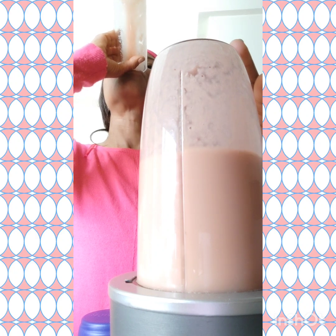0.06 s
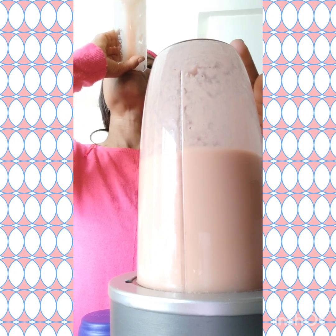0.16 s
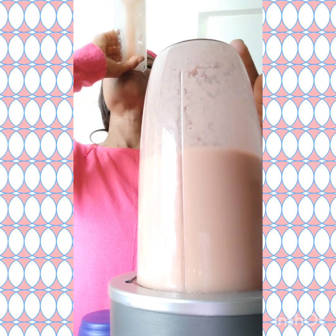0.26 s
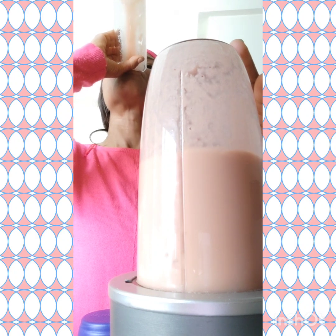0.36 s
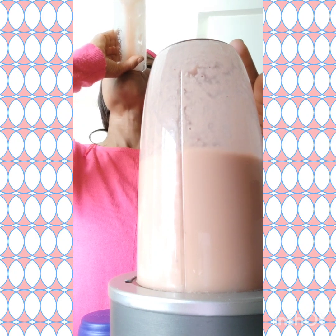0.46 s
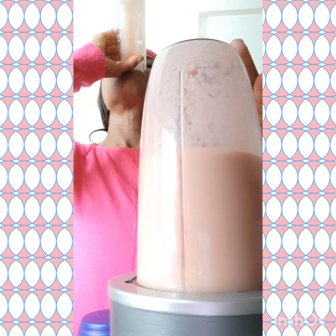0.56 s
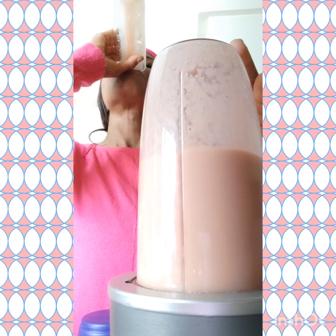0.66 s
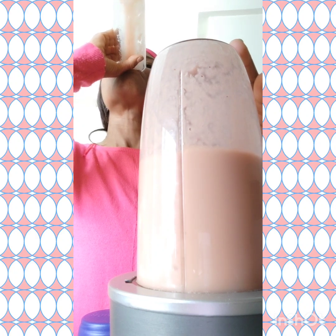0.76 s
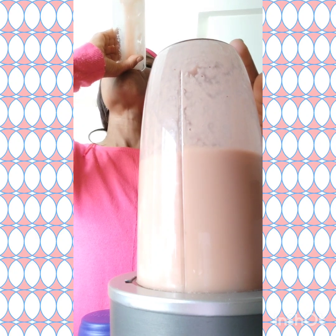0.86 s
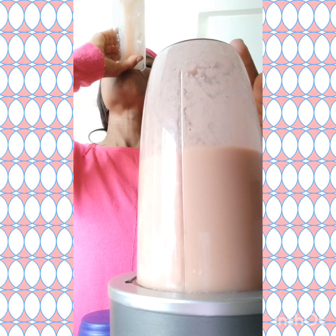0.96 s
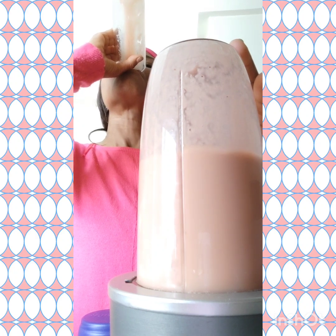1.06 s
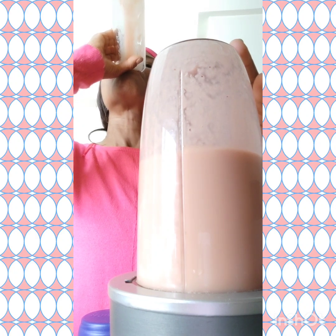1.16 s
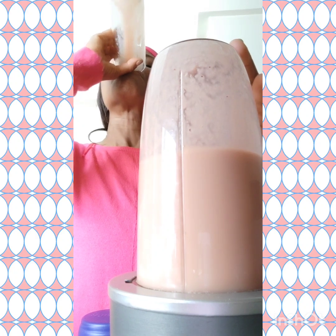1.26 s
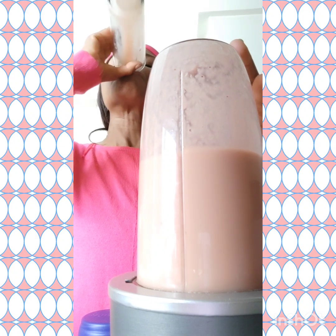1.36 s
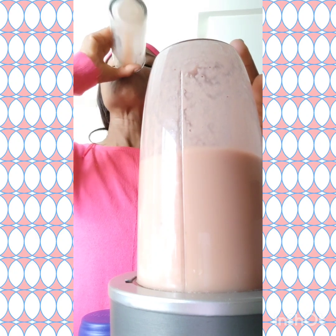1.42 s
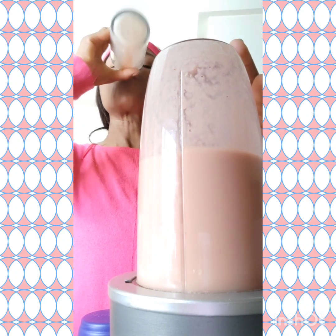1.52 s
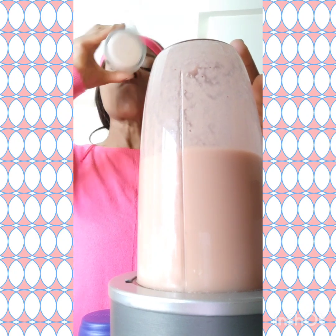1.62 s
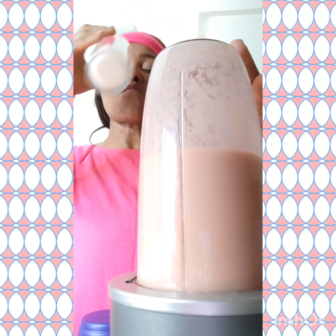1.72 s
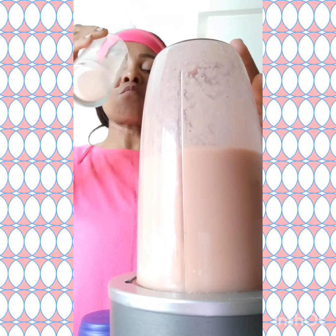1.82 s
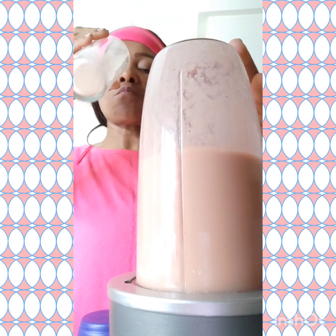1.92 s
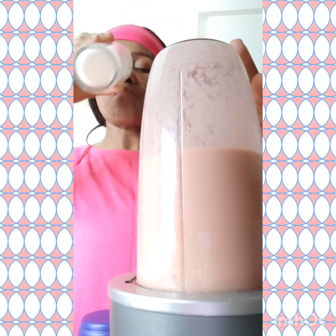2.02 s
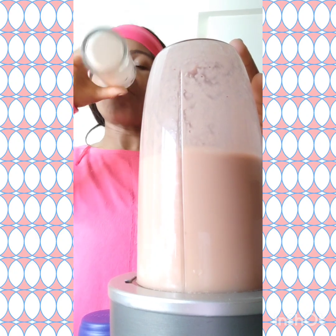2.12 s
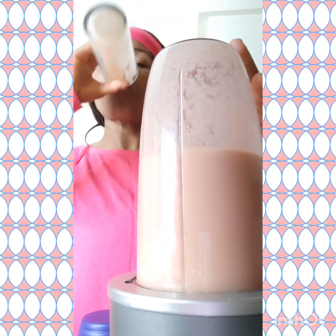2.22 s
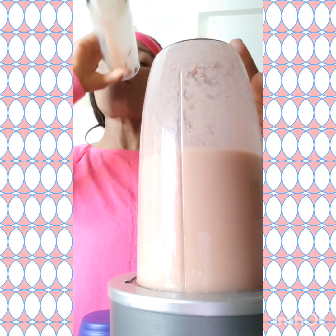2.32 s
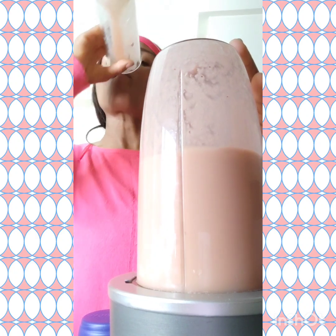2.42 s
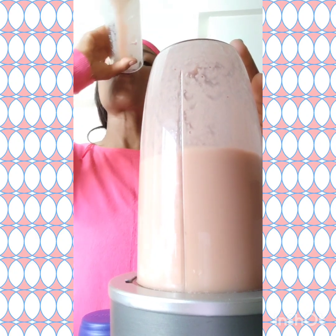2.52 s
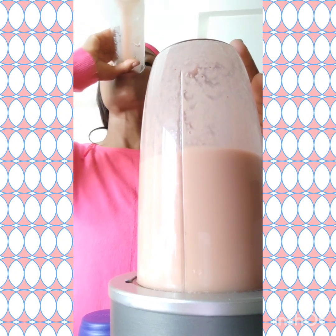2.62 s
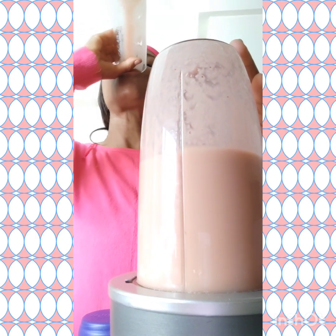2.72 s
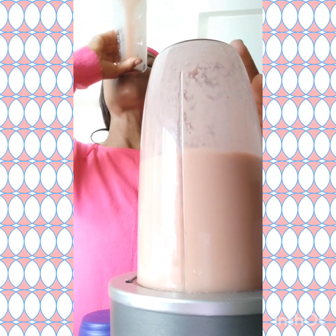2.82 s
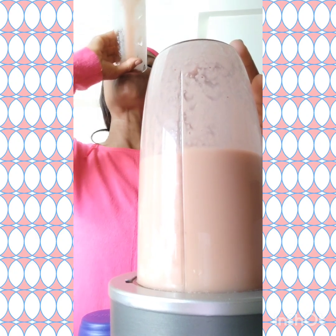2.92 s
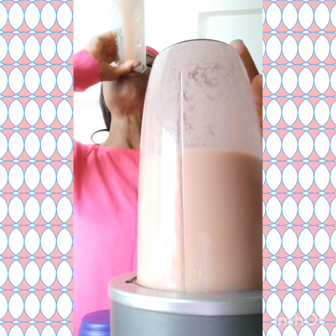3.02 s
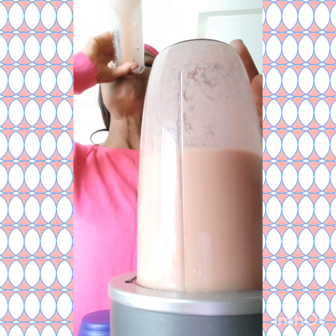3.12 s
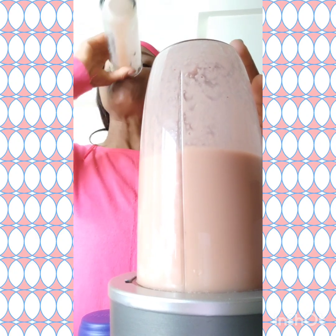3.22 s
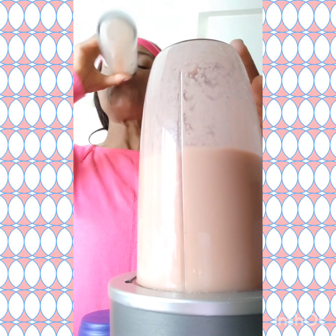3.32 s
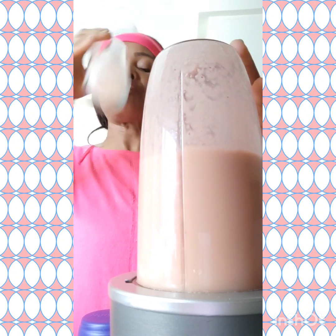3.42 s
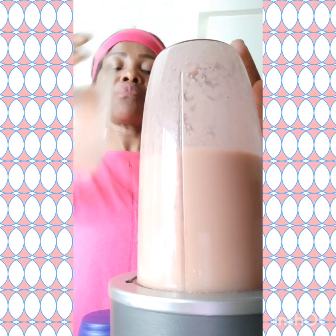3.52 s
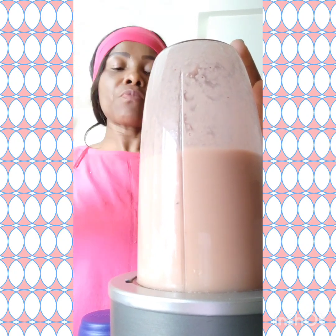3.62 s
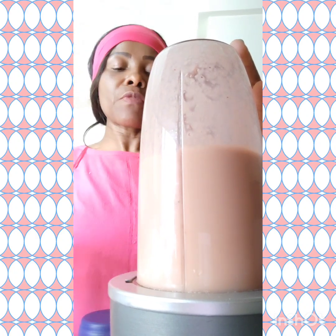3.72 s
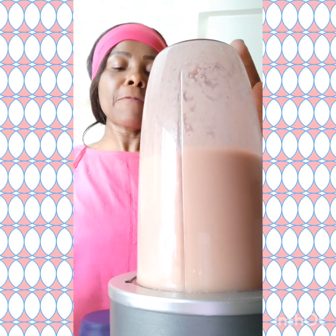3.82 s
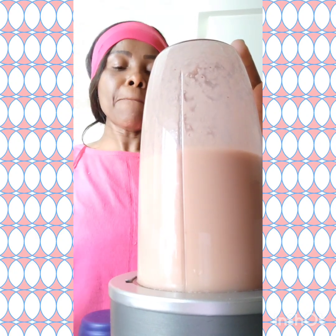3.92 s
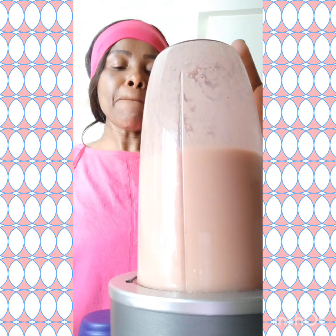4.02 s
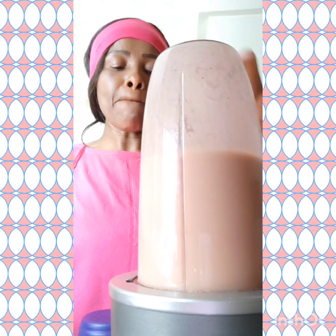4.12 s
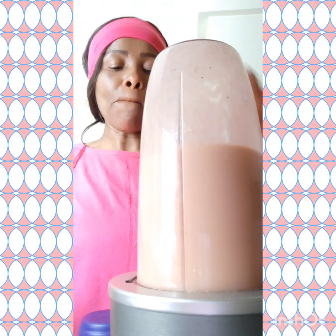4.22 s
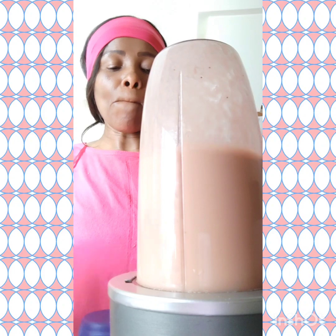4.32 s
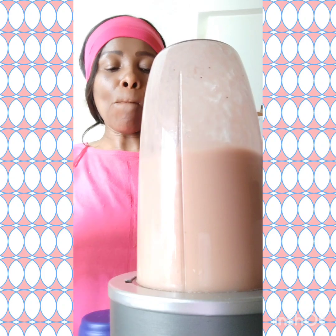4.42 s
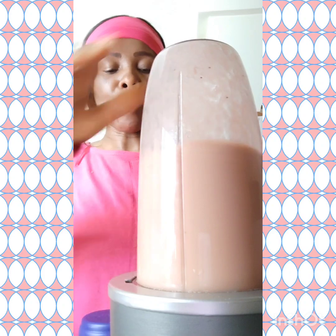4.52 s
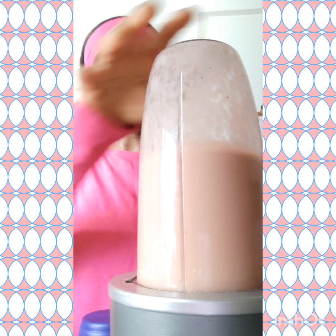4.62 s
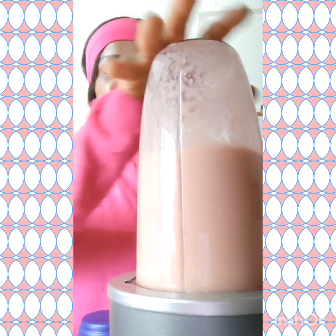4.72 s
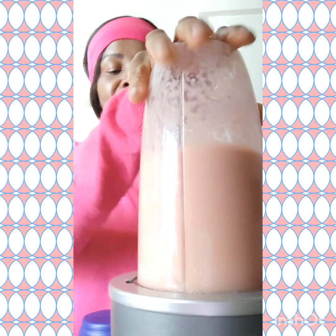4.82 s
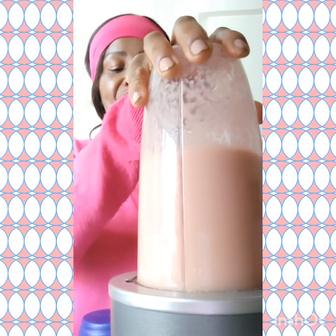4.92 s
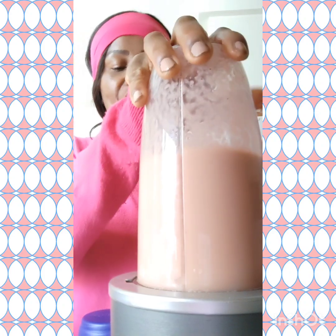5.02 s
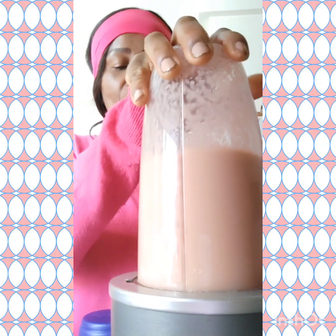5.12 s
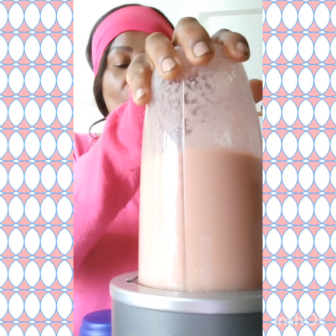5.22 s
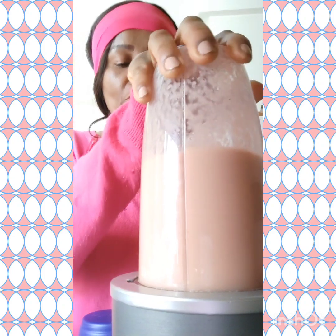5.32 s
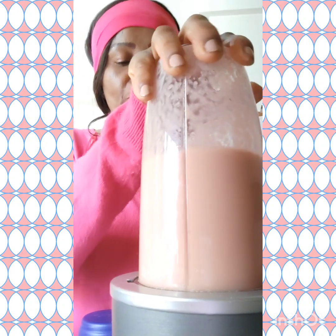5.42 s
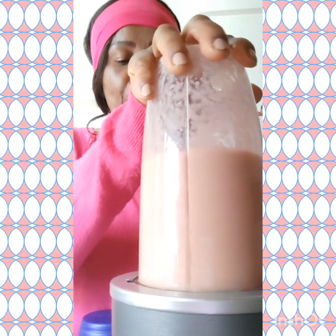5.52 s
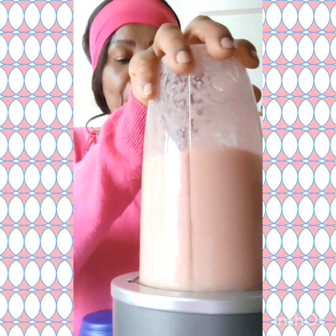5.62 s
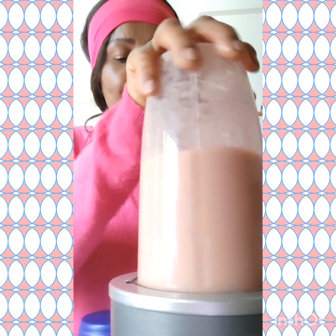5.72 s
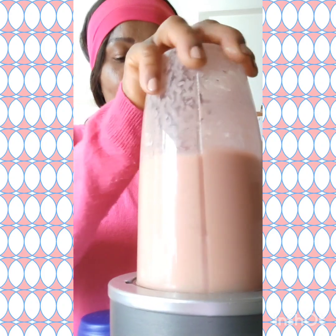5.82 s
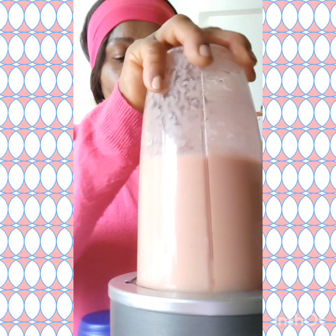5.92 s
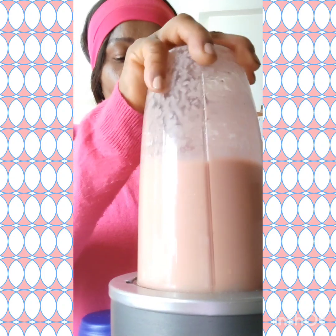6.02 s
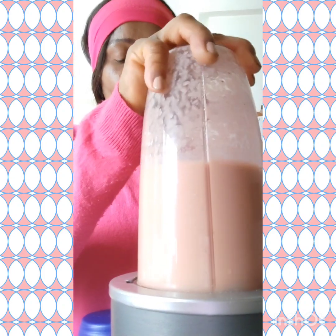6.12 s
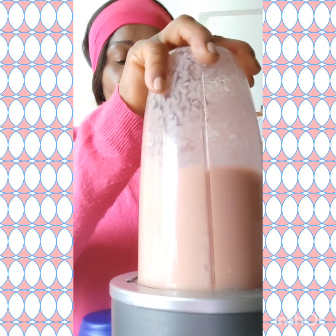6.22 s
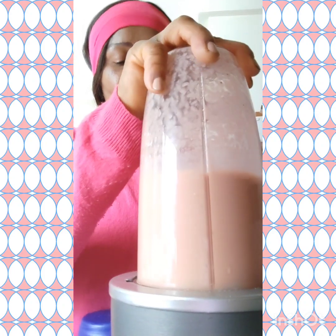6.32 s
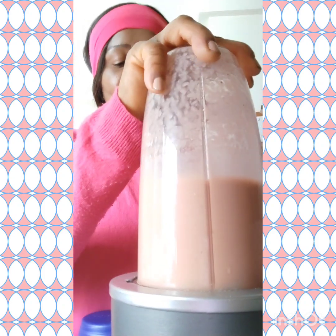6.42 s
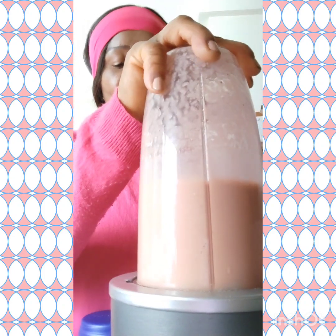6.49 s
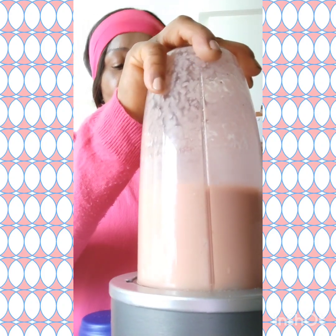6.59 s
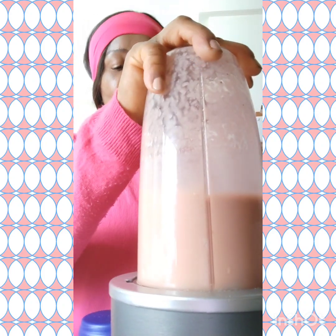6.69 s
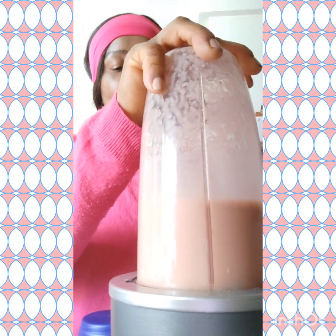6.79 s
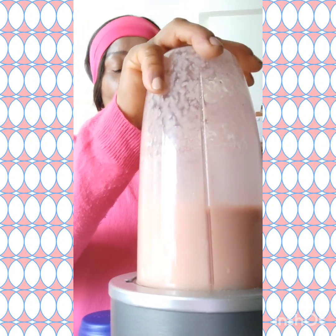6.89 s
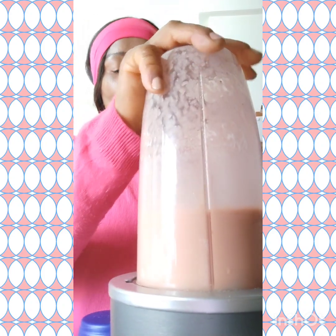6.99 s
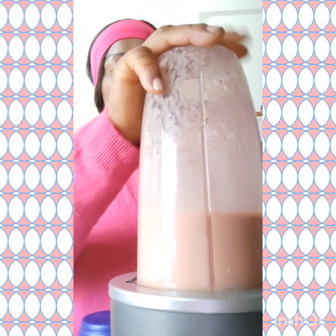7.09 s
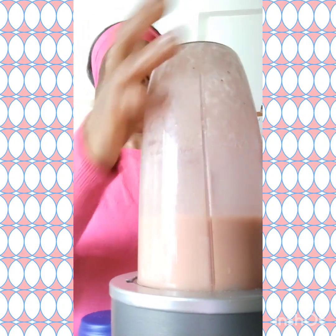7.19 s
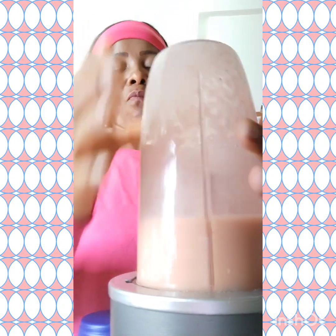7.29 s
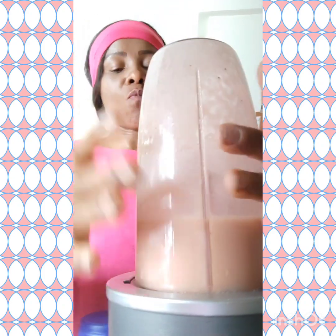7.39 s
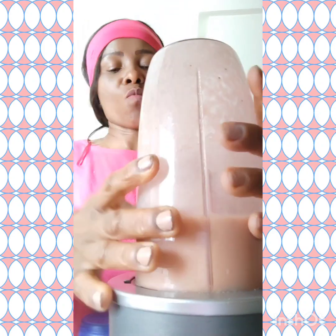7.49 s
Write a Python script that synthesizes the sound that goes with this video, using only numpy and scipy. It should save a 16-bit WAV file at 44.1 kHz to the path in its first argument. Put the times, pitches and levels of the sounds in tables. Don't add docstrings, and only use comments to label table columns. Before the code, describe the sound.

Close, harsh blender drone with one dull cup knock; power goes off, pitch slides down over a second, leaving faint taps in a quiet room.

```python
import sys
import numpy as np
from scipy import signal
from scipy.io import wavfile
from scipy.ndimage import uniform_filter1d

SR = 44100
rng = np.random.default_rng(int(sys.argv[2]) if len(sys.argv) > 2 else 0)


def file_out(sig):
    cols = np.atleast_2d(sig).T
    lim = np.clip(cols, -1, 1)
    pcm = np.round(lim * 32767).astype(np.int16)
    wavfile.write(sys.argv[1], SR, pcm)


def level_to_linear(level):
    exponent = np.asarray(level, float) / 20
    return 10 ** exponent


N = 332955
T = np.arange(N) / SR
FFT, HOP = 2048, 512

ROTOR_TONES = [(0, 1, -.1), (1, -1, -.3), (1, 0, -.6), (1, 1, -1.9), (2, -1, 1.6), (2, 0, -2), (2, 1, -1.3),
               (3, 0, -1.1), (5.286, 0, -1), (9, 0, .35), (10.572, 0, 1.4), (18, 0, -2.4), (27, 0, -2.5)]
# (left level [dB], right level [dB], waver [dB])
ROTOR_TONE_LEVELS = [(-54.5, -52, 0), (-35.5, -34, 0.3), (-30.5, -32, .4), (-47, -49, 2.5),
                     (-54.5, -46, 1.4), (-51, -43.5, 1.5), (-58.5, -56, 1), (-52.5, -45, 2),
                     (-44.5, -29, 1), (-32, -28.5, 1.85), (-46, -35, 1.5), (-36, -30.5, 2),
                     (-38.5, -38.5, 3.5)]
# (frequency [Hz], width [Hz], gain [dB])
BASE_RESONANCES = [(206, 80, 15), (152, 43, 11), (115, 18, 7)]
# (frequency [Hz], left density [dB/Hz], right density [dB/Hz])
CHURN_FLOOR = [(45.0, -93.5, -90.5), (85.0, -79, -83), (109, -66, -63), (300.0, -69.5, -68),
               (600.0, -67.5, -81.5), (1000.0, -67, -78), (1520, -60, -55), (2620, -60.5, -52.5),
               (3900, -61.5, -55), (6150, -68, -64.5), (10000.0, -69.5, -64.5), (12500.0, -70.5, -72.5),
               (14780, -80, -80.5), (15700.0, -85, -88.5)]
# (frequency [Hz], width [Hz], left [dB/Hz], right [dB/Hz], left phase
BLENDER_MODES = [(208.0, 107.0, -63.8, -62.4, 0.7), (460.0, 114.0, -72.0, -61.0, -0.0),
                 (831.0, 213.0, -65.0, -57.0, 1.2), (1119.0, 138.0, -87.2, -51.6, -2.7),
                 (1344.0, 268.0, -67.6, -53.5, -1.0), (1522.0, 130.0, -58.8, -55.7, -1.7),
                 (1757.0, 140.0, -67.4, -53.4, -0.6), (2017.0, 453.0, -52.7, -51.6, -1.2),
                 (2415.0, 60.0, -61.7, -65.2, -0.5), (2645.0, 66.0, -67.0, -52.6, 2.2),
                 (3002.0, 189.0, -56.9, -45.8, -1.4), (3254.0, 229.0, -46.7, -39.6, 0.4),
                 (3441.0, 76.0, -79.2, -44.2, 2.9), (3611.0, 264.0, -59.4, -49.9, 0.2),
                 (4008.0, 139.0, -57.6, -51.9, 1.0), (4147.0, 109.0, -56.5, -58.4, 1.6),
             (4427.0, 183.0, -61.4, -55.5, 0.4), (4828.0, 153.0, -60.4, -58.3, -0.4),
             (5548.0, 494.0, -64.5, -66.1, 1.2), (6114.0, 60.0, -64.5, -73.5, 0.7),
             (7267.0, 694.0, -67.2, -68.5, 0.3), (7849.0, 700.0, -92.0, -64.7, -2.4),
             (8496.0, 700.0, -73.6, -65.9, -3.1), (9168.0, 162.0, -68.7, -62.9, 1.3),
             (9617.0, 437.0, -71.6, -66.1, -0.1), (10413.0, 363.0, -93.1, -63.0, -1.3),
             (11549.0, 180.0, -69.3, -94.5, 1.1)]
# (frequency [Hz], likeness [0-1], left phase lead [rad])
CHURN_LIKENESS = [(40, .5, .1), (90, .96, .35), (200, .96, .6), (300, .8, .8), (600, .3, 0), (3000, .35, 0),
                  (6000, .25, 0)]
# (frequency [Hz], running level [dB], change under grip [dB])
CHURN_LAYERS = [(180, 1.1, 0.5), (500, 0.5, 1), (1500, -1.34, -1), (3300, 0.28, 0.33), (8000, -0.1, -.2)]
# (slope [dB/decade], knee [share of full speed], extra slope below knee [dB/decade])
LAYER_FADING = [(10, .005, 60), (12, 0.025, 63), (12, 0.035, 62), (.5, 0.14, 63.5), (31, 0.066, 78.5)]
# (frequency [Hz], width [Hz], left [dB], right [dB])
REFLECTION_BUMPS = [(625, 52, -9.5, -1), (986, 38, 1.5, 0), (1074, 40, 4.5, 3.5), (1600, 70, -2, -5.5),
                    (1843, 66, -0.5, -8.5), (2092, 73, 2, 2.5), (2837, 76, -2, -5), (2790, 60, 1, 3),
                    (3102, 70, 3.5, 7.5), (3040, 40, -2.5, -6.5), (3312, 59, -4.5, 3.5),
                    (3500, 46, 3.5, -4), (3790, 200, 1.5, -3.5), (4684, 52, -4, -4.5),
                    (5010, 250, -0.5, 1.5), (6280, 140, -3, -6)]
# (frequency [Hz], width [Hz], left change [dB], right change [dB])
COASTING_BUMPS = [(120, 38, 10, 8.5), (200, 60, -6.5, -3), (293, 120, 0.5, -8), (60.1, 54, -8.5, -6.5),
                  (470, 74, 2, 7.5), (610, 110, -17, -0.5), (1390, 120, -5, 6), (1730, 150, 3.5, 9),
                  (2140, 200, -1.5, -2), (2200, 86, 5, 7), (2570, 100, -1, 9.5), (2720, 150, -3.5, -5.5),
                  (3020, 150, 3, -7), (3180, 100, -4, 1), (3358, 96, -0.5, 9), (3720, 150, -2, 1),
                  (3960, 120, -2, 2), (4300, 150, -9, -2), (4650, 250, -3, 8.5), (5100, 250, -7, -3.5)]
# (frequency [Hz], width [Hz], left change [dB], right change [dB])
STOPPING_BUMPS = [(190, 63, -1, -1), (330, 120, -7, -4), (540, 130, 10, 15), (1750, 200, -3, -1.5),
                  (3200, 230, -6, -10), (3600, 200, -3, -3), (3430, 120, 6, 1), (12500, 2700, 4, 5)]
# (frequency [Hz], level [dB], t60 [s])
CUP_RING = [(152, -1.5, .13), (190, 0, .045), (550, -10, .1), (715, -2, .06), (790, -3, .05),
            (300, -6, .07), (410, -7, .06), (930, -4, .04)]
# (frequency [Hz], level [dB], t60 [s])
TAP_RING = [(250, 1, .04), (765, -14, .06), (1150, -11, .025), (2050, -8, .03), (2630, -4, .03),
            (3560, -2, .03), (3980, 0.5, .035), (7700, -10, .015)]
# (time [s], peak [dB], brightness [Hz], t60 [s])
TAP_HITS = [
    (7.2495, -44.5, 5000, .1),
    (7.368, -73, 13000, .02),
    (7.424, -75, 11000, .03),
    (7.434, -73, 11000, .025),
    (6.662, -50, 15000, .03),
]
# (frequency [Hz], density [dB/Hz])
ROOM_SPECTRUM = [(40, -19), (100, -10.5), (135, -19.5), (177, -3), (191, 1.5), (227, -6.5), (355, -20.5),
                 (382, -30), (527, -38), (582, -33.5), (933, -36.5), (5000, -40), (15000, -40)]
# (time [s], level [dB])
ROOM_SWELL = [(6.98, -81), (7.204, -77.5), (7.42, -75), (7.55, -72)]
# (frequency [Hz], level [dB], t60 [s])
THUMP_RING = [(118, -1.5, .15), (190, 1, .12), (260, -7, .1), (500, -17, .08), (765, -18, .1)]

MAINS_HZ, POWER_OFF_S, LEFT_LAG_SAMPLES = 100, 5.67, 36
RUN_HZ, DRAG_S, FRICTION_HZ, FREE_S = 254.8, .74, 42, 5.675
SEIZE_HZ, SEIZE_SOFT_HZ = 12.3, 2.1
GRIP_S, GRIP_RISE_S = 4.53, .99
SHAFT_DB, SHAFT_GRIP_DB, UNBALANCE_DB_PER_DECADE = .53, -1.4, 39
HUM_START_DB, HUM_DB_PER_S, HUM_GRIP_DB = -10.5, 2.5, 9.5
JOLT_DB, JOLT_S = -16, .015
BEARING_SWAY_DB, FAN_DB, FAN_SWAY_DB, SWAY_HZ = 1.77, 1.6, -.5, 1.7
FAN_SAG_DB, FAN_SAG_S = -1.5, 3.3


def curves(rows, at):
    x, *columns = np.transpose(rows)
    return [np.interp(at, x, column) for column in columns]


def spectra(rows, hz):
    rows = np.array(rows, float)
    return curves(np.c_[np.log(rows[:, 0]), rows[:, 1:]], np.log(hz + 1))


def slow(rate_hz):
    x = signal.lfilter(*signal.butter(2, rate_hz, fs=SR / 64), rng.standard_normal(N // 64 + 2))
    return np.interp(np.arange(N), np.arange(len(x)) * 64, x / x.std())


def bumps(rows, hz):
    total_db = 0
    for f, width, left_db, right_db in rows:
        total_db = total_db + np.outer([left_db, right_db], np.exp(-(2 * (hz - f) / width) ** 2))
    return total_db


def noise_pair(power, link, gain=1):
    z = signal.stft(rng.standard_normal((2, N)), SR, nperseg=FFT, noverlap=FFT - HOP)[2]
    link = (link / np.maximum(abs(link), 1))[:, None]
    own = np.sqrt(np.clip(1 - abs(link) ** 2, 0, 1))
    pair = np.array([link * z[1] + own * z[0], z[1]])
    shaped = pair * np.sqrt(power * SR / 2)[..., None] * gain
    return signal.istft(shaped, nperseg=FFT, noverlap=FFT - HOP)[1][:, :N]


def coasting(t):
    decay = np.exp(-np.maximum(t - FREE_S, 0) / DRAG_S)
    return np.maximum((RUN_HZ + FRICTION_HZ) * decay - FRICTION_HZ, .5)


def grip(t):
    return np.clip((t - GRIP_S) / GRIP_RISE_S, 0, 1)


def shake():
    hz = coasting(T)
    base_db = sum(db * np.exp(-(2 * (hz - f) / width) ** 2) for f, width, db in BASE_RESONANCES)
    shaft_db = SHAFT_DB + UNBALANCE_DB_PER_DECADE * np.log10(hz / RUN_HZ) + base_db - base_db[0]
    shaft_db += SHAFT_GRIP_DB * np.minimum(5 * grip(T), 1)
    shaft_db += JOLT_DB * np.exp(-((T - FREE_S - .005) / JOLT_S) ** 2)
    hum_db = HUM_START_DB + HUM_DB_PER_S * T + HUM_GRIP_DB * grip(T)
    return shaft_db, hum_db


def tones(turns):
    shaft_db, hum_db = shake()
    bearing_db = BEARING_SWAY_DB * slow(SWAY_HZ)
    fan_db = FAN_DB + FAN_SAG_DB * np.clip((T - FAN_SAG_S) / .3, 0, 1) + FAN_SWAY_DB * slow(SWAY_HZ)
    since_off_s = np.maximum(T - POWER_OFF_S, 0)
    out = np.zeros((2, N))
    for (order, beats, lead), (left_db, right_db, waver_db) in zip(ROTOR_TONES, ROTOR_TONE_LEVELS):
        phase = 2 * np.pi * (order * turns + beats * MAINS_HZ * T + rng.random())
        if beats == 0 and 0 < order < 3:
            db = shaft_db - 30 * since_off_s * (order - 1)
        else:
            if order == 0:
                db = hum_db
            elif order % 1:
                db = bearing_db
            else:
                db = fan_db * (order > 8)
            db = db - since_off_s * (150 + 60 * order)
        gain = np.sqrt(2) * level_to_linear(db + waver_db * slow(18))
        out += gain * [level_to_linear(left_db) * np.cos(phase + lead), level_to_linear(right_db) * np.cos(phase)]
    return out


def effort(t):
    soft_hz = SEIZE_SOFT_HZ * np.logaddexp(0, (coasting(t) - SEIZE_HZ) / SEIZE_SOFT_HZ)
    left = 1e-4 + soft_hz / (RUN_HZ - SEIZE_HZ)
    levels = []
    for (_, db, grip_db), (slope, knee, steep) in zip(CHURN_LAYERS, LAYER_FADING):
        knee_db = steep / 2 * np.log10((1 + (knee / left) ** 2) / (1 + knee ** 2))
        levels.append(db + grip_db * grip(t) + slope * np.log10(left) - knee_db)
    return np.array(levels)


def churn(speed, turns):
    hz = np.fft.rfftfreq(FFT, 1 / SR)
    frames_s = np.arange(N // HOP + 2) * HOP / SR
    power = level_to_linear(np.array(spectra(CHURN_FLOOR, hz))) ** 2
    same, same_lead = spectra(CHURN_LIKENESS, hz)
    shared = np.clip(same, 0, 1) * np.sqrt(power[0] * power[1]) * np.exp(1j * same_lead)
    for f, width, left_db, right_db, lead in BLENDER_MODES:
        shape = 1 / (1 + (2 * (hz - f) / width) ** 2) ** 2
        power = power + np.outer(level_to_linear(np.array([left_db, right_db])) ** 2, shape)
        shared += .81 * level_to_linear(left_db + right_db) * shape * np.exp(1j * lead)
    lag = np.exp(-2j * np.pi * hz * LEFT_LAG_SAMPLES / SR)
    link = shared / np.sqrt(power[0] * power[1]) * lag

    layer_log_hz = np.log(np.array(CHURN_LAYERS)[:, 0])
    change_db = np.array([np.interp(np.log(hz + 1), layer_log_hz, row) for row in effort(frames_s).T]).T
    slowing = np.clip((frames_s - POWER_OFF_S) / .69, 0, 1)
    stopping = np.clip((frames_s - 6.3) / .41, 0, 1)
    change_db = change_db + bumps(REFLECTION_BUMPS, hz)[..., None]
    change_db = change_db + bumps(COASTING_BUMPS, hz)[..., None] * slowing
    change_db = change_db + bumps(STOPPING_BUMPS, hz)[..., None] * stopping
    patches = uniform_filter1d(rng.standard_normal(change_db.shape[1:]), 20, 0)
    patches = uniform_filter1d(patches, 5, 1)
    change_db = change_db + .75 * patches / patches.std()
    count = signal.stft(T, nperseg=FFT, noverlap=FFT - HOP)[2].shape[1]
    noise = noise_pair(power, link, level_to_linear(change_db[..., :count]))
    throb_db = (.25 + 3 * np.exp(-speed / 50)) * np.cos(2 * np.pi * turns)
    return noise * level_to_linear(throb_db + .33 * slow(10) + .6 * slow(200))


def knock(start_s, peak_db, modes, scatter_db, scatter_hz, scatter_s, rise_s):
    t = T[:SR // 3]
    ring = -sum(level_to_linear(db - 60 * t / t60) * np.sin(2 * np.pi * hz * t) for hz, db, t60 in modes)
    band = signal.butter(3, [90, scatter_hz], "band", fs=SR, output="sos")
    scatter = signal.sosfilt(band, rng.standard_normal((2, len(t))))
    sound = ring + level_to_linear(scatter_db - 60 * t / scatter_s) * scatter / scatter.std()
    sound = sound * np.minimum(t / rise_s, 1)
    out = np.zeros((2, N + SR))
    out[:, round(start_s * SR):][:, :len(t)] = level_to_linear(peak_db) * sound / abs(sound).max()
    return out[:, :N]


def cup():
    return knock(3.929, -5.5, CUP_RING, -7.5, 550, .22, .0038)


def taps():
    return sum(knock(s, db, TAP_RING, 2, hz, t60, .001) for s, db, hz, t60 in TAP_HITS)


def room():
    hz = np.fft.rfftfreq(FFT, 1 / SR)
    power = level_to_linear(spectra(ROOM_SPECTRUM, hz)[0]) ** 2
    hum = noise_pair(np.array([power, power]), .9 / (1 + (hz / 600) ** 2))
    return hum / hum.std() * level_to_linear(curves(ROOM_SWELL, T)[0] + 1.5 * slow(8))


def thump():
    return knock(7.265, -51, THUMP_RING, -18, 4400, .25, .004)


def scene():
    speed = coasting(T) * (1 + .00191 * slow(13.7) + .001 * slow(2))
    turns = np.cumsum(speed) / SR
    return tones(turns) + churn(speed, turns) + cup() + taps() + room() + thump()


def band_limit(x):
    return signal.sosfilt(signal.butter(12, 15750, fs=SR, output="sos"), x)


def record(dry):
    x = signal.sosfilt(signal.butter(3, 50, "high", fs=SR, output="sos"), dry)
    over = np.maximum(abs(x) - .6, 0)
    x = x - np.sign(x) * (over - .4 * np.tanh(over / .4))
    return band_limit(x)


dry = scene()
out = record(dry)
file_out(out)
```